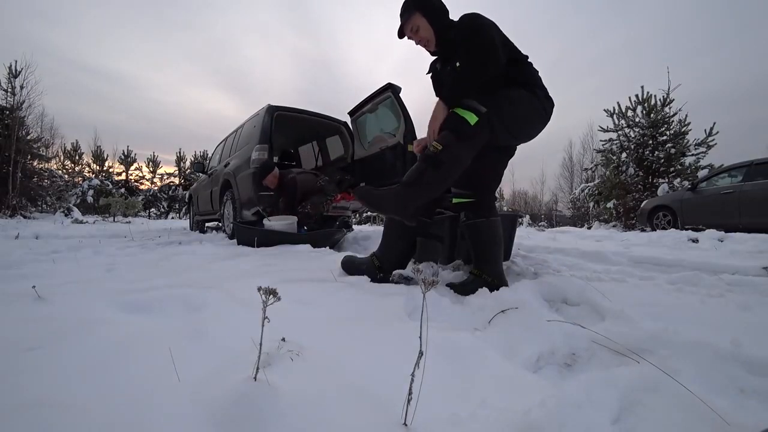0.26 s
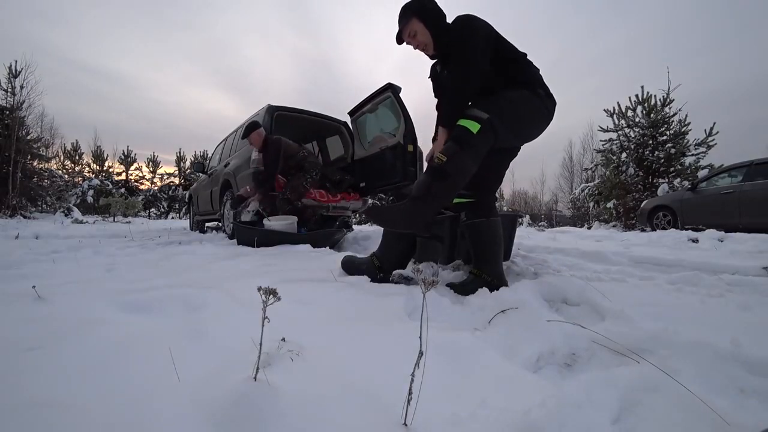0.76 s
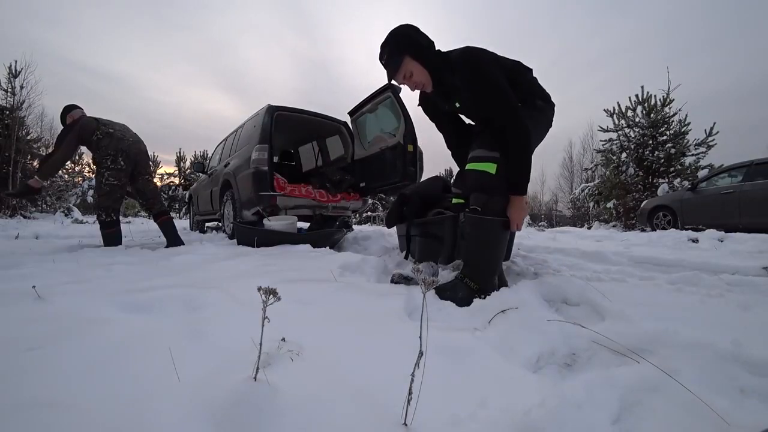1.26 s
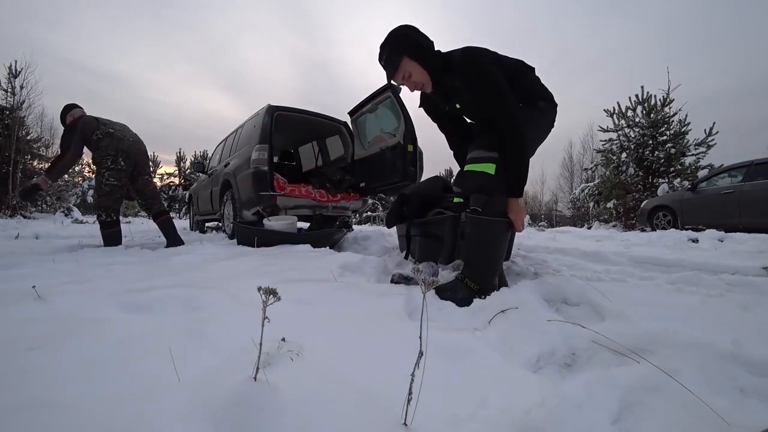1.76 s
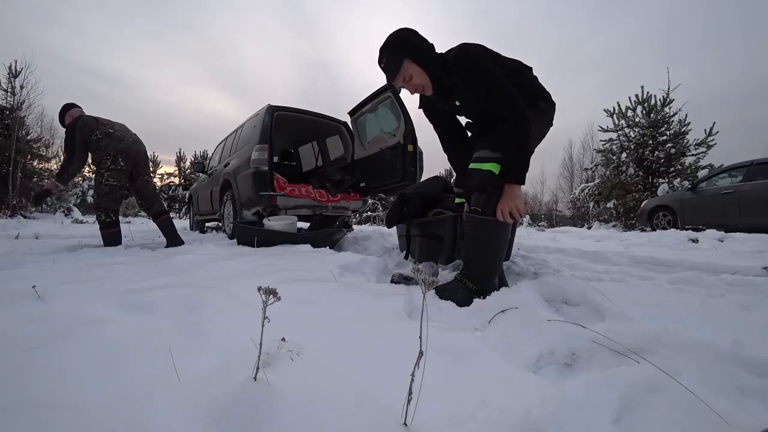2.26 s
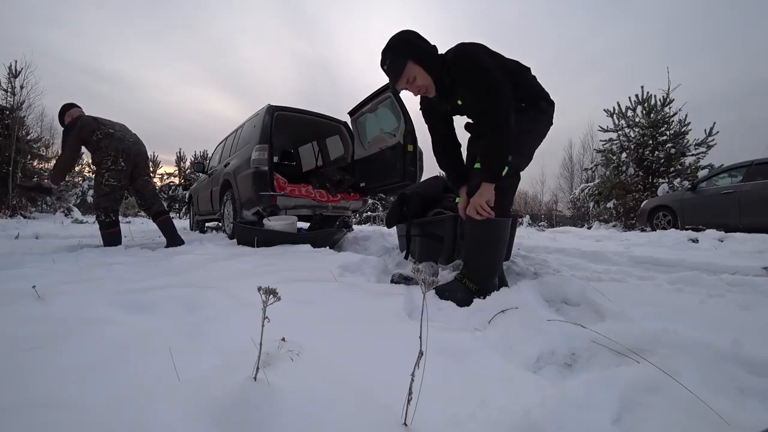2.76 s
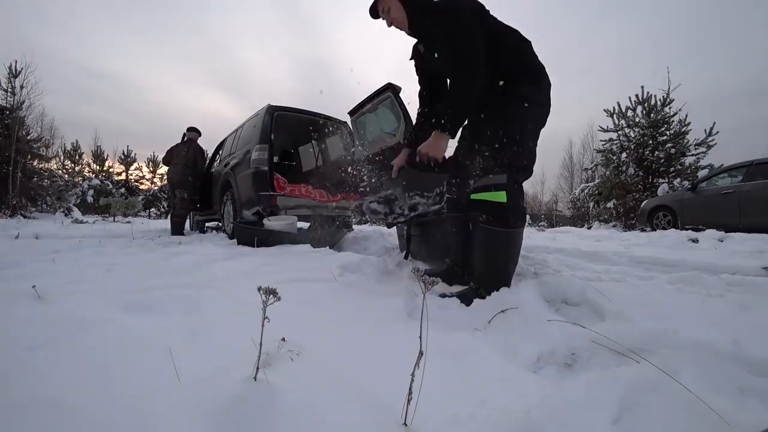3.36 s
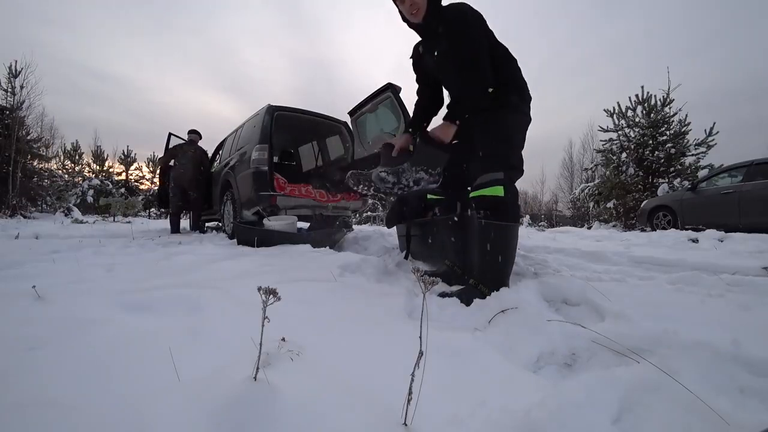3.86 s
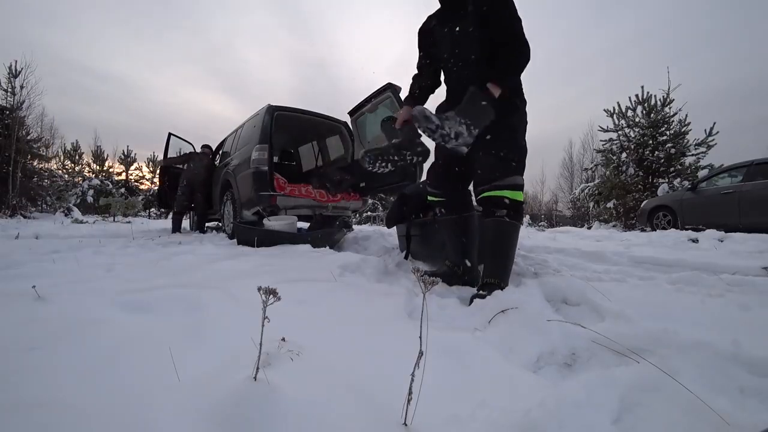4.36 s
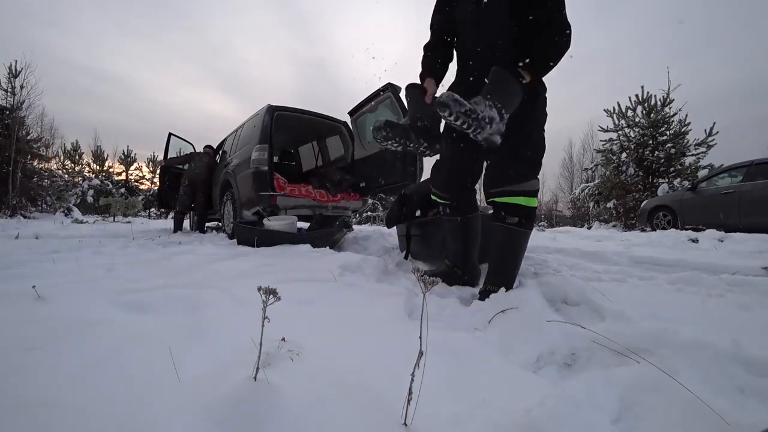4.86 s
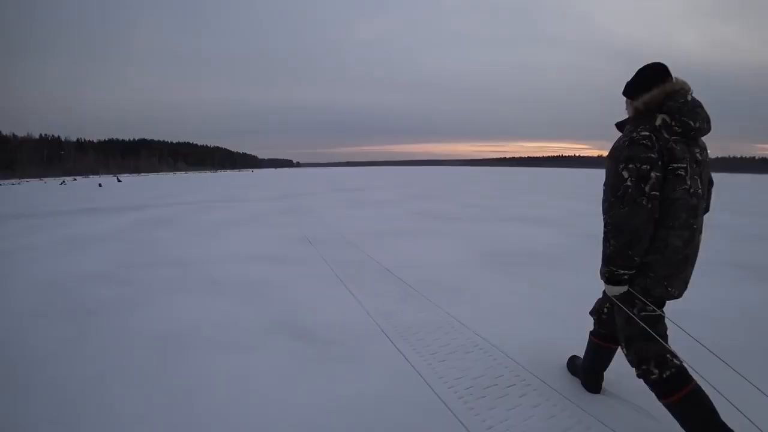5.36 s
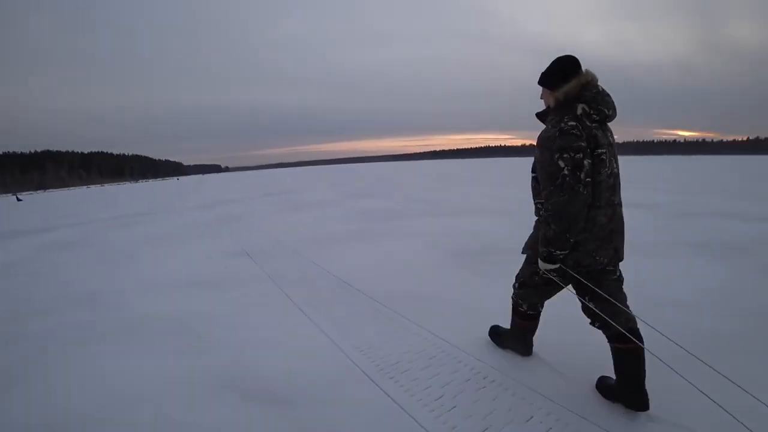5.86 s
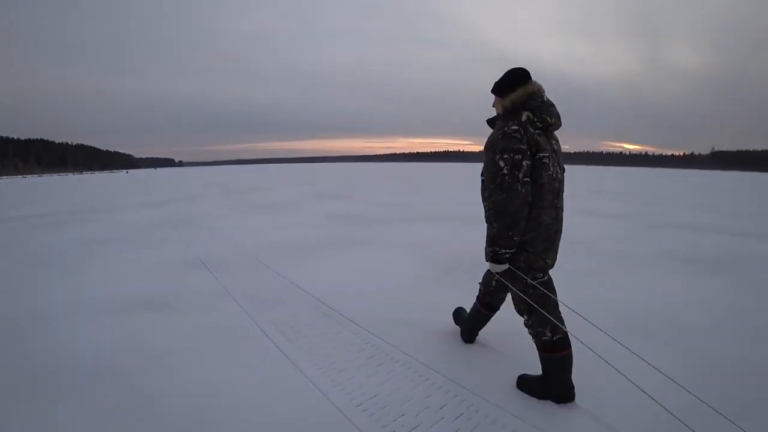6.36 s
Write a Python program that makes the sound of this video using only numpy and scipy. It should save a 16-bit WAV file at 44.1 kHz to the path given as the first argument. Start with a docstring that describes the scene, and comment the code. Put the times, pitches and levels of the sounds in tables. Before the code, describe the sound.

Five hollow slaps on a rubber boot and four sole-on-sole knocks outdoors, followed by a dragged sled, crunching footsteps and wind rumble.

```python
"""Outdoors on frozen snow, in still air, close to a stereo microphone. A man's winter clothes rustle and
crumbs of ice tick down. From 1.1 s he slaps a rubber boot five times: wall and hollow ring under his
palm, and the first slap sweeps off a hiss of snow. From 3.8 s he knocks two boots together four times,
sole on sole, shaking more snow loose. At 5.4 s the scene changes, with a brief click, to an open frozen
lake: a walker drags a hissing sled over the crust, his boots crunch, wind rumbles on the microphone."""
import sys
import numpy as np
from scipy import signal
from scipy.fft import rfft, irfft, next_fast_len
from scipy.io import wavfile
from scipy.ndimage import uniform_filter1d

SR = 44100
rng = np.random.default_rng(int(sys.argv[2]) if len(sys.argv) > 2 else 0)


def unload_audio(sound):
    """Save the sound as a 16-bit wav file, at the path given as the first command line argument."""
    columns = np.transpose(np.atleast_2d(sound))
    # keep every value between -1 and 1, then stretch to whole-number steps
    steps = np.round(np.clip(columns, -1, 1) * 32767)
    wavfile.write(sys.argv[1], SR, steps.astype(np.int16))


N = 290839
T = np.arange(N) / SR
BRIEF = T[:8192]  # time axis of one hit [s]
PADDED = next_fast_len(N, real=True)
HZ = np.fft.rfftfreq(PADDED, 1 / SR)
LAKE_S = 5.44  # the lake takes over

# Likeness of left and right, close to the boots and on the lake: (frequency [Hz], correlation [0..1])
NEAR_LIKENESS = [(100, 0.97), (300, 0.73), (1200, 0.45), (2500, 0.76), (6000, 0.86), (11000, 0.62)]
LAKE_LIKENESS = [(100, 0.87), (270, 0.96), (570, 0.89), (1200, 0.66), (5000, 0.76), (11000, 0.33)]
# Sled and walker lie right of centre: (frequency [Hz], left minus right [dB])
LAKE_BALANCE = [(100, -0.5), (340, -1.5), (620, -3), (1100, -4), (2000, -4.5), (3500, -2), (11000, -3)]

# Spectra of air and friction: (frequency [Hz], relative level [dB])
STILL_AIR = [(20, -18), (145, -2.5), (303, -16), (603, -8.5), (1260, -10.5), (2570, -15), (3930, -13.5),
             (9140, -22), (10200, -14.5), (11000, -25)]
WIND = [(10, 5), (25, 6.5), (45, -8), (70, -3), (130, -26), (300, -26), (900, -46)]
RUNNERS = [(59, -14), (110, -7.5), (220, -6), (300, -1.5), (560, -6), (900, -5.5), (1600, -8.5),
           (3000, -11), (4700, -12), (11000, -19)]
CRUNCH = [(350, -12), (600, -3), (1170, -3), (1290, -1), (1670, -7), (1980, 0), (4100, 1), (10100, -5),
          (11000, -10)]
CLOTH = [(60, -14), (150, -13), (330, -5), (620, 2), (1100, -1), (1900, -2.5), (3000, -1.5), (4000, -0.5),
         (6000, -5.5), (9000, -9.5), (11000, -9.5)]
RUBBER_FLEX = [(30, -1.5), (70, 2.5), (130, 1), (210, 1), (330, -4.5), (600, -10.5), (1500, -76)]
SNOW_SPRAY = [(150, -2), (450, -2), (880, 12), (1300, 2.5), (1900, 9.5), (2400, 7), (3100, 4), (4500, 7.5),
              (6400, -6), (11000, -13.5)]
# Spectra of the blows: (frequency [Hz], relative level [dB])
CRACK = [(700, 2), (1500, 9.5), (2100, 5), (3200, 7.5), (4400, 3.5), (5600, -3.5), (7800, -7), (11000, -20)]  # bright edge of a slap
SMACK = [(150, -30), (420, 1), (600, 1.5), (950, 0.5), (1300, -6), (1750, -7), (2300, -24), (5000, -80)]  # its midrange
THUMP = [(30, -17), (70, -5.5), (120, 0.5), (200, -5.5), (300, -9), (1000, -38)]  # dull push of the palm
TREAD_CLICK = [(700, -36), (1400, 8.5), (2300, 1.5), (3300, 10), (4300, 2.5), (5600, -3), (7800, -9.5),
               (11000, -14.5)]  # tread on tread
AIR_CLAP = [(150, -26), (380, 4.5), (540, 2), (690, -1.5), (850, -5), (1200, -9), (1750, -17),
            (2400, -16.5), (5000, -42)]  # air squeezed out between two soles
BOOT_BODY = [(40, -8), (85, -1.5), (125, 6.5), (200, 4.5), (320, -2), (480, -7.5), (680, -11.5), (1000, -7),
             (2000, -56.5)]  # thud of the whole boot

# Modes of a boot: (frequency [multiple of the pitch], level [dB], decay [share of the t60])
SHAFT_MODES = [(.88, -6.5, 0.99), (1.15, -0.5, 0.33)]  # the hollow, slapped from the side
WALL_MODES = [(.59, -9.5, 0.78), (1, 12, 1)]  # the taut rubber under the palm
SOLE_MODES = [(1, 0, 1), (1.4, 0, 0.67), (2.1, -9, 1), (2.7, -6.5, 0.57), (3.55, -13, 0.49)]  # the hollow, knocked or bumped

# Wind at the microphone: (time [s], level [dB])
GUSTS = [(5.45, -45), (5.52, -41.5), (5.58, -35), (5.69, -50), (5.83, -45), (5.95, -42), (6.1, -43),
         (6.4, -49), (6.59, -45.5)]
# Runners scraping on hard patches: (time [s], half length [s], level [dB], centre [Hz])
SCRAPES = [(5.948, 0.027, -32.5, 1080), (6.545, 0.02, -32, 880)]
# A brief crunchy click as the scene changes to the lake (first row), then boots pressing into the crust:
# (time [s], half length [s], level [dB])
CRUNCHES = [(5.449, 0.016, -37), (5.612, 0.06, -39.5), (5.807, 0.056, -30.5), (5.96, 0.079, -38),
            (6.404, 0.05, -31), (6.545, 0.1, -38)]
# Arm strokes rubbing a nylon sleeve: (time of peak [s], rise [s], fall [s], level [dB])
ARM_STROKES = [(.01, 0.033, 0.18, -48), (.335, 0.017, 0.058, -41.5), (.39, 0.048, 0.13, -51),
               (.975, 0.22, 0.073, -41), (1.47, 0.48, 0.13, -51.5), (2.001, 0.12, 0.23, -46.5),
               (2.21, 0.061, 0.09, -47), (2.55, 0.3, 0.17, -47), (2.97, 0.13, 0.14, -47.5),
               (3.135, 0.05, 0.035, -52.5), (3.275, 0.035, 0.052, -47), (3.42, 0.059, 0.066, -42),
               (3.95, 0.061, 0.086, -47.5), (4.37, 0.84, 0.75, -52), (4.82, 0.059, 0.07, -47.5),
               (5.26, 0.5, 0.19, -47.5)]
# Sleeves, trouser legs and shafts brushing: (time [s], half length [s], level [dB], centre [Hz])
SWISHES = [(.232, 0.1, -54.5, 3560), (.34, 0.017, -46, 560), (.688, 0.0077, -48.5, 4700),
           (.92, 0.13, -53, 990), (3.38, 0.018, -47, 245), (3.63, 0.054, -52.5, 3750)]
# Rubber creaking as a boot is turned: (time [s], half length [s], level [dB])
BOOT_TURNS = [(0.548, 0.19, -59.5), (3.446, 0.08, -60), (3.644, 0.067, -54)]
# Crumbs of ice and snaps of stiff cloth: (time [s], level [dB], centre [Hz])
TICKS = [(0.997, -33.5, 920), (1.0937, -43, 850), (1.9755, -37, 2170), (3.075, -39, 680),
         (3.281, -36.5, 860), (3.287, -38, 1280), (3.346, -40.5, 3800), (3.362, -42, 860),
         (3.396, -41.5, 820), (3.844, -36, 706), (3.9005, -19.5, 8100), (3.9008, -31, 2070),
         (4.117, -41.5, 1470), (4.272, -42, 3000), (4.455, -37, 7100), (4.456, -38, 940),
         (5.099, -40, 5400), (5.2254, -34.5, 950), (5.2248, -34, 5000), (5.262, -41, 3640)]
# Soft shafts springing back or bumping: (time [s], level [dB], pitch [Hz])
BUMPS = [(1.296, -45, 210), (1.5997, -38.5, 270), (1.6288, -30.5, 317), (2.4779, -30.5, 318),
         (3.361, -39, 260), (4.1919, -37, 247), (4.271, -42, 266), (4.6176, -37.5, 149), (4.9128, -30, 161)]
# Snow surging down the shaft: (time [s], half length [s], level [dB])
SNOW_SLIDES = [(1.202, 0.0065, -42), (1.267, 0.027, -52.5)]
# A hand landing on the shaft, one to three contacts a slap:
# (time [s], crack [dB], smack [dB], thump [dB], hollow [dB], hollow pitch [Hz], wall pitch [Hz])
SLAPS = [(1.1261, -16, -25, -24, -21, 1020, 2780), (1.612, -38, -35, -60, -27.5, 850, 2540),
         (1.616, -21.5, -24.5, -33, -17, 498, 2770), (2.0554, -21.5, -25.5, -44, -41, 566, 2260),
         (2.0579, -21.5, -37, -32, -21, 515, 3040), (2.4534, -35, -28.5, -34, -32, 664, 3130),
         (2.466, -18.5, -40, -29, -30, 560, 2110), (2.936, -19, -23, -25, -39, 564, 2440),
         (2.938, -23, -30, -38, -17, 585, 2520), (2.941, -21.5, -27, -45, -30, 587, 2540)]
# Boot against boot, with rebounds: (time [s], click [dB], clap [dB], thud [dB], resting pitch [Hz],
# hollow t60 [s], loosened snow [dB], contact time [s], click brightness [frequency factor])
KNOCKS = [(3.8143, -16.5, -21, -16, 212.8, 0.057, -48, 0.0042, 0.95),
          (4.297, -16, -16, -18, 167.7, 0.062, -35, 0.0051, 1.18),
          (4.662, -36, -37, -41, 134, 0.056, -43, 0.015, 0.81),
          (4.7422, -23, -15, -17.5, 166.6, 0.064, -38, 0.0061, 1.28),
          (5.1335, -30, -27.5, -23, 190, 0.029, -71, .0035, 1.63),
          (5.1435, -22.5, -17.5, -11.5, 179, 0.019, -69, 0.0004, 0.71),
          (5.1801, -27.5, -28, -31, 260, 0.014, -51, 0.00062, 0.71),
          (5.1992, -28, -43, -19.5, 175, 0.029, -60, 0.0046, 1.42),
          (5.2410, -30.5, -40, -37.5, 142, 0.094, -76, .004, 1.08)]


def amp(db):
    """Decibels to gain."""
    return 10 ** (np.asarray(db) / 20)


def unit_rms(x):
    """Scales to rms 1."""
    return x / np.sqrt(np.mean(x ** 2) + 1e-20)


def unit_peak(x):
    """Scales so that the loudest 3 ms have rms 1."""
    return x / np.sqrt(uniform_filter1d(x ** 2, 130, mode="constant").max())


def read(points, hz):
    """Reads a table along log frequency."""
    f, value = np.transpose(points)
    return np.interp(np.log(hz + 1), np.log(f + 1), value)


def pan(db):
    """Left and right gains; positive dB leans left."""
    return amp(np.array([np.atleast_1d(db), -np.atleast_1d(db)]) / 2)


def add(mix, s, sound):
    """Adds a stereo sound at a time."""
    part = mix[:, round(s * SR):][:, :sound.shape[1]]
    part += sound[:, :part.shape[1]]


def ramp(s, length_s):
    """Goes from 0 to 1, starting at a moment."""
    return np.clip((T - s) / length_s, 0, 1)


def swell(s, rise_s, fall_s):
    """A smooth rise to 1 at a moment and a smooth fall after it."""
    return np.exp(-np.minimum(abs(T - s) / np.where(T < s, rise_s, fall_s), 10) ** 2)


def swells(rows):
    """The summed gain of several symmetric swells."""
    return sum(amp(db) * swell(s, half, half) for s, half, db in rows)


def wander(rate_hz):
    """A smooth random curve of rms 1."""
    spectrum = rfft(rng.standard_normal(PADDED)) * np.exp(-(HZ / rate_hz) ** 2)
    return unit_rms(irfft(spectrum, PADDED)[:N])


def hump(centre_hz, octaves, depth_db=50):
    """The spectrum of one resonance."""
    hz = np.geomspace(20, 20000, 200)
    db = -10 * np.log10(1 + (np.log2(hz / centre_hz) / octaves) ** 4)
    return np.c_[hz, np.maximum(db, -depth_db)]


def noise(colour, likeness=NEAR_LIKENESS, grain_db=0, grains_per_s=3000):
    """Coloured stereo noise of rms 1; grain_db roughens it into tiny slips of uneven size."""
    slip = (T * grains_per_s).astype(int) % N
    size = amp(grain_db * np.minimum(rng.exponential(1, N), 5))[slip]
    left, other = rfft(rng.standard_normal((2, N)) * size, PADDED)
    shared = np.clip(read(likeness, HZ), -1, 1)
    right = shared * left + np.sqrt(1 - shared ** 2) * other
    return unit_rms(irfft(np.array([left, right]) * amp(read(colour, HZ)), PADDED)[:, :N])


def rubs(rows, likeness):
    """Short swells of friction, each in one narrow band."""
    return sum(amp(db) * swell(s, half, half) * noise(hump(hz, octaves=0.4), likeness)
               for s, half, db, hz in rows)


def burst(colour, snap, contact_s, tail_db, tail_t60, width, steady_below_hz=1500):
    """An impact: a sharp touch, breaking grains while the surfaces close, and a tail of scatter."""
    n = len(BRIEF)
    hz = abs(np.fft.fftfreq(n, 1 / SR))
    fall = np.exp(-np.minimum(BRIEF / contact_s, 10) ** 2) + amp(tail_db - 60 * BRIEF / tail_t60)
    drive = rng.standard_normal((2, n)) * fall / np.linalg.norm(fall)
    drive[0, 0] += snap
    # The bass keeps its colour from hit to hit; the treble stays ragged.
    power = uniform_filter1d(abs(np.fft.fft(drive)) ** 2, 41, mode="wrap")
    steadiness = 1 / (1 + (hz / steady_below_hz) ** 2)
    log_gain = np.log(amp(read(colour, hz))) - steadiness * np.log(power / power.mean() + 0.1) / 2
    minimum_phase = np.exp(np.conj(signal.hilbert(log_gain)))
    response = np.fft.ifft(minimum_phase).real[:, :n // 4]
    mid, side = signal.fftconvolve(drive, response, axes=1)[:, :n]
    mid = unit_peak(mid)
    side = width * side * np.linalg.norm(mid) / np.linalg.norm(side)
    return np.array([mid + side, mid - side])


def ring(modes, hz, t60, rise_s, squeeze=0, relax_s=0.014):
    """Damped modes of rubber and the air inside: sharp while squeezed, sagging as the rubber relaxes."""
    cycles = hz * np.cumsum(1 + squeeze * np.exp(-BRIEF / relax_s)) / SR
    swing = sum((-1) ** k * amp(db - 60 * BRIEF / (t60 * share)) * np.sin(2 * np.pi * ratio * cycles)
                for k, (ratio, db, share) in enumerate(modes))
    return unit_peak(swing * (1 - np.exp(-BRIEF / rise_s)))


def still_air(level_db=-57):
    """The faint, steady outdoor bed under both places."""
    return amp(level_db) * noise(STILL_AIR)


def wind():
    """Gusts buffet the microphone with a low rumble."""
    return amp(np.interp(T, *np.transpose(GUSTS))) * noise(WIND, LAKE_LIKENESS)


def sled(start_db=-37, glide_db=-31.5, speedup_s=0.41):
    """Runners hiss over countless grains of crust, louder as the sled gathers speed."""
    glide = amp(start_db + (glide_db - start_db) * ramp(LAKE_S, speedup_s))
    return glide * noise(RUNNERS, LAKE_LIKENESS, grain_db=1.5) * amp(0.5 * wander(28))


def crunches():
    """A brief crunchy click as the scene changes to the lake; after it, boots crunch into the crust."""
    return swells(CRUNCHES) * noise(CRUNCH, LAKE_LIKENESS, grain_db=1.5, grains_per_s=1700)


def lake():
    """Out on the open lake: sled and walker a little to the right, wind on the microphone."""
    crust = sled() + crunches() + rubs(SCRAPES, LAKE_LIKENESS)
    placed = irfft(rfft(crust, PADDED) * pan(read(LAKE_BALANCE, HZ)), PADDED)[:, :N]
    return placed + wind()


def held(lift_s=3.38, lower_s=4.9, grip_s=0.12):
    """Rises to 1 while the boots are held up, then returns to 0."""
    return ramp(lift_s, grip_s) - ramp(lower_s, grip_s)


def rub_strength(resting_db=-62, held_db=-57):
    """Arm strokes add their power to that of clothes that never lie quite still."""
    steady = amp(resting_db) ** 2 + (amp(held_db) * held()) ** 2
    strokes = sum((amp(db) * swell(s, rise, fall)) ** 2 for s, rise, fall, db in ARM_STROKES)
    return np.sqrt(steady + strokes)


def sleeves():
    """Nylon rubs on nylon in a grainy, flickering rustle."""
    return rub_strength() * noise(CLOTH, grain_db=2, grains_per_s=1900) * amp(1.46 * wander(23))


def crackle(level_db=-58, snaps_per_s=90, spread_db=3.5):
    """Frozen cloth and ice crackle while the boots are held up, scattered from left to right."""
    onsets = rng.random(N) < snaps_per_s / SR
    sizes = amp(spread_db * np.clip(rng.standard_normal(N), -2, 2))
    snap = burst(CLOTH, snap=0.5, contact_s=0.001, tail_db=-20, tail_t60=0.02, width=0.5)
    impulses = onsets * sizes * pan(2 * rng.standard_normal(N))
    return amp(level_db) * held() * unit_rms(signal.oaconvolve(impulses, snap, axes=1)[:, :N])


def flexing(flex_db=-61, held_db=-56, wobble_db=-47, wobble_t60=0.48):
    """Rubber flexes with the arms, wobbles after a slap and creaks while held up or turned."""
    with_arms = amp(flex_db) * np.sqrt(unit_rms(rub_strength()))
    wobble = np.max([(T > s) * amp(wobble_db - 60 * abs(T - s) / wobble_t60) for s, *_ in SLAPS], axis=0)
    soft = np.hypot(with_arms, wobble) * noise(RUBBER_FLEX, grain_db=2.5, grains_per_s=120)
    strain = amp(held_db) * held() + swells(BOOT_TURNS)
    return soft + strain * noise(RUBBER_FLEX, grain_db=2.5, grains_per_s=140)


def handling():
    """The small noises of clothes and rubber, close to the microphone."""
    return sleeves() + crackle() + flexing() + rubs(SWISHES, NEAR_LIKENESS)


def ticks():
    """Ice crumbs land and stiff cloth snaps: dry clicks, each with its own pitch."""
    out = np.zeros((2, N))
    for s, db, hz in TICKS:
        colour = hump(hz, octaves=0.7, depth_db=30)
        tick = burst(colour, snap=0.3, contact_s=0.0025, tail_db=-9, tail_t60=0.04, width=0.26)
        add(out, s, amp(db) * tick)
    return out


def bumps(push_db=-11):
    """A soft push sets the hollow of a boot swinging."""
    out = np.zeros((2, N))
    for s, db, hz in BUMPS:
        push = burst(BOOT_BODY, snap=0.54, contact_s=0.0061, tail_db=0, tail_t60=0.055, width=0.08)
        hollow = ring(SOLE_MODES, hz, t60=0.015, rise_s=0.0025)
        add(out, s, amp(db) * (amp(push_db) * push + hollow))
    return out


def snow_spray(sweep_db=-28, t60=0.39, rasp_hz=2310):
    """The first slap sweeps off a hiss of snow; the rest slides down the shaft with a singing rasp."""
    age = T - SLAPS[0][0]
    sweep = (age > 0) * amp(sweep_db - 60 * abs(age) / t60 + 1.7 * wander(89))
    slide = swells(SNOW_SLIDES)
    rasp = (slide + sweep / 2) * noise(hump(rasp_hz, octaves=0.13), grain_db=4.5)
    hiss = (sweep + amp(-3) * slide) * noise(SNOW_SPRAY, grain_db=1.5)
    return (rasp + hiss) * pan(3.7)


def loosened_snow(t60=0.15, rise_s=0.0034):
    """After each knock, clumps and crumbs patter away while the shafts shake."""
    patter = np.zeros(N)
    for s, *_, snow_db, _, _ in KNOCKS:
        age = np.maximum(T - s, 0)
        patter += amp(snow_db - 60 * age / t60) * (1 - np.exp(-age / rise_s))
    clumps = amp(9) * noise(SMACK, grain_db=2.5, grains_per_s=1000)
    crumbs = amp(0.5) * noise(CLOTH, grain_db=5, grains_per_s=1100)
    shake = amp(5.5) * noise(BOOT_BODY)
    return patter * (clumps + crumbs + shake)


def knocks():
    """Close, near centre, heavy soles meet: tread clicks, trapped air claps, the boots thud and ring."""
    out = np.zeros((2, N))
    for s, click_db, clap_db, thud_db, hz, t60, _, contact_s, brightness in KNOCKS:
        tread = np.multiply(TREAD_CLICK, [brightness, 1])
        click = burst(tread, snap=0.68, contact_s=contact_s, tail_db=-18.5, tail_t60=60 * contact_s,
                      width=0.19)
        clap = burst(AIR_CLAP, snap=0.32, contact_s=contact_s, tail_db=-10, tail_t60=0.024, width=0.07)
        body = burst(BOOT_BODY, snap=0.49, contact_s=0.0089, tail_db=17, tail_t60=1.68 * t60, width=0.049)
        hollow = ring(SOLE_MODES, hz, t60, rise_s=0.0053, squeeze=0.38)
        thud = amp(-3) * body + amp(0.5) * hollow
        add(out, s, amp(click_db) * click + amp(clap_db) * clap + amp(thud_db) * thud)
    return (out + loosened_snow()) * pan(-0.33)


def shudder(below_smack_db=11.5, t60=0.11, centre_hz=520):
    """The slapped shaft shudders on in a narrow band."""
    strength = sum((T > s) * amp(smack_db - below_smack_db - 60 * abs(T - s) / t60)
                   for s, _, smack_db, *_ in SLAPS)
    return strength * noise(hump(centre_hz, octaves=0.4))


def slaps(finger_lead_s=0.0051, hollow_t60_cycles=9.7):
    """Close, left of centre: fingers touch, the palm cracks, the wall rings and the hollow booms."""
    out = np.zeros((2, N))
    for s, crack_db, smack_db, thump_db, hollow_db, hz, wall_hz in SLAPS:
        crack = burst(CRACK, snap=0.99, contact_s=0.0011, tail_db=-15.5, tail_t60=0.1, width=0.48)
        smack = burst(SMACK, snap=0.069, contact_s=0.0018, tail_db=-22.5, tail_t60=0.19, width=0.1)
        thump = burst(THUMP, snap=0.32, contact_s=0.0086, tail_db=-23, tail_t60=0.035, width=0.052)
        fingers = burst(CRACK, snap=0.41, contact_s=0.0094, tail_db=-25, tail_t60=0.05, width=0.34)
        wall = ring(WALL_MODES, wall_hz, t60=0.012, rise_s=0.000063)
        hollow = ring(SHAFT_MODES, hz, hollow_t60_cycles / hz, rise_s=0.0021, squeeze=0.051)
        palm = amp(crack_db) * crack + amp(smack_db) * smack + amp(thump_db) * thump
        boot = amp(crack_db - 1.5) * wall + amp(hollow_db) * hollow
        add(out, s - finger_lead_s, amp(crack_db - 14) * fingers)
        add(out, s, palm + boot)
    return (out + shudder()) * pan(3.8)


def scene(lead_s=0.031, lead_db=-15):
    """The boot cleaning, then the lake, which is faintly heard just before it takes over."""
    on_lake = np.maximum(T > LAKE_S, amp(lead_db) * ramp(LAKE_S - lead_s, lead_s / 2))
    air = still_air()
    cleaning = slaps() + knocks() + bumps() + ticks() + handling() + snow_spray()
    return air + (1 - on_lake) * cleaning + on_lake * lake()


def record(dry, edge_hz=11130):
    """The microphone chain cuts off the top treble steeply."""
    lowpass = signal.firwin(401, edge_hz, window=("kaiser", 7), fs=SR)
    return signal.oaconvolve(dry, lowpass[None], "same", axes=1)


dry = scene()
out = record(dry)
unload_audio(out)
```